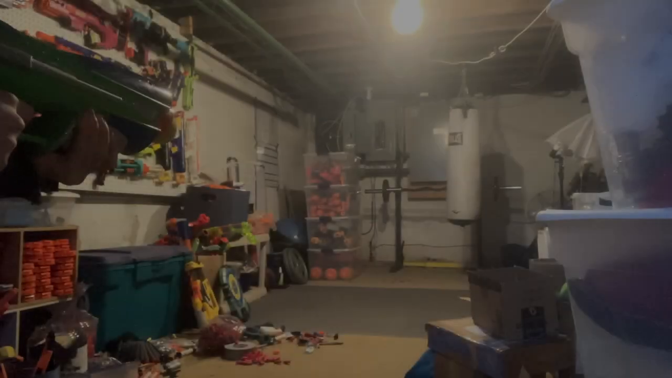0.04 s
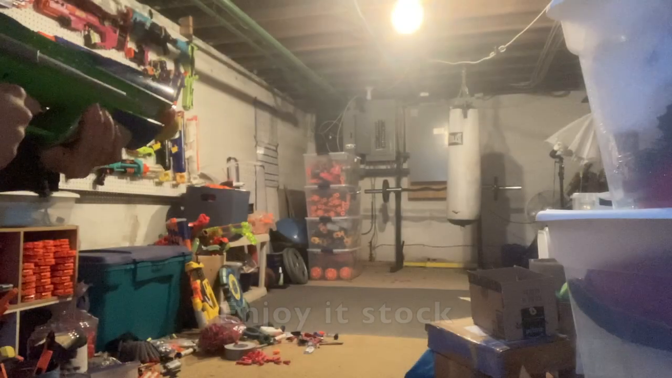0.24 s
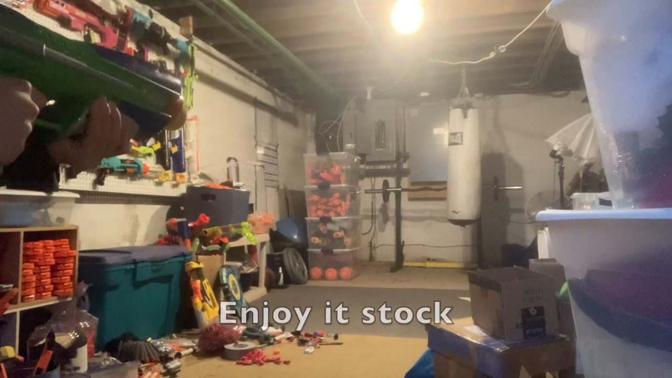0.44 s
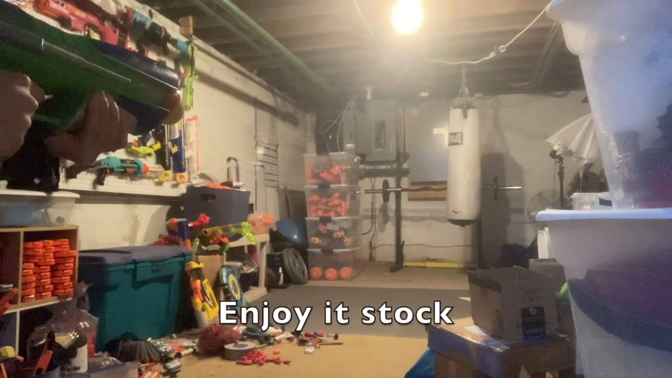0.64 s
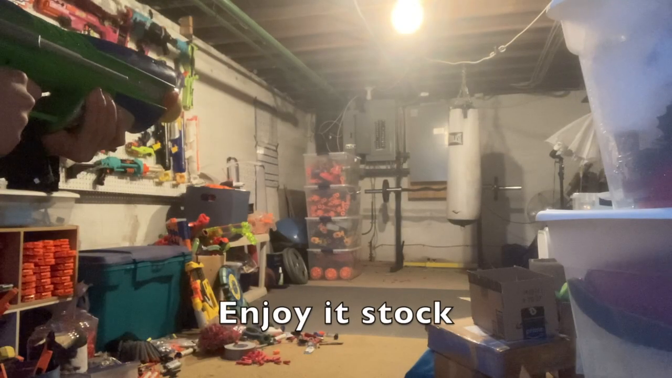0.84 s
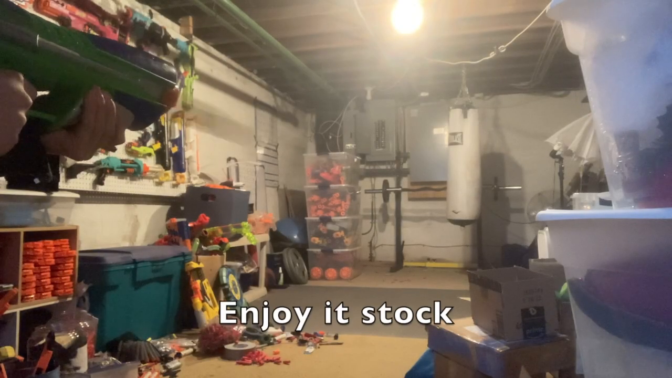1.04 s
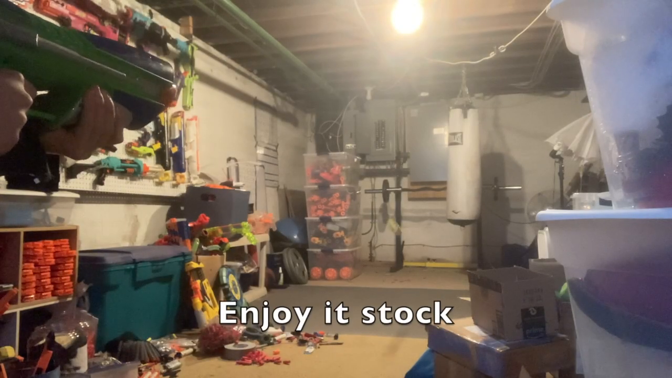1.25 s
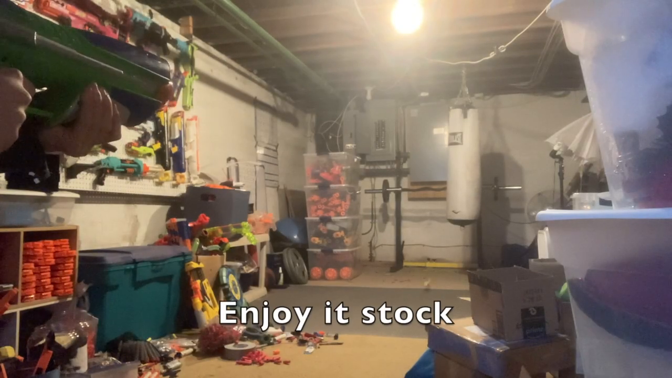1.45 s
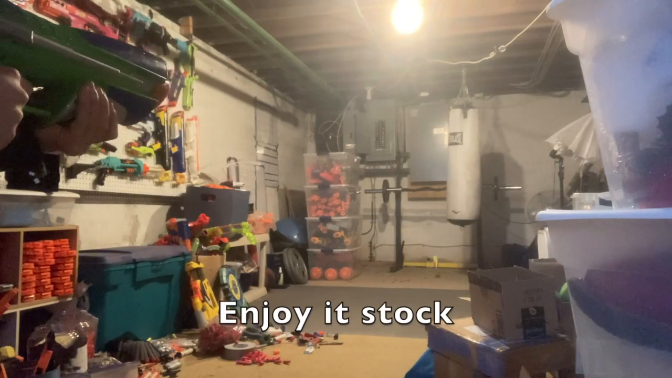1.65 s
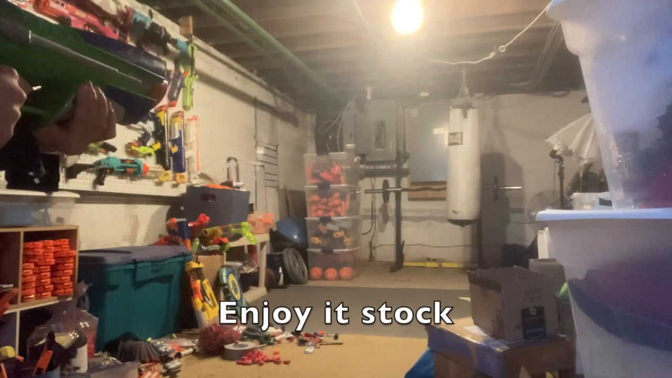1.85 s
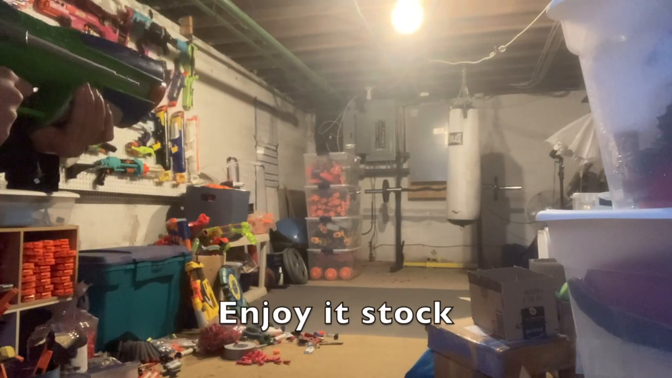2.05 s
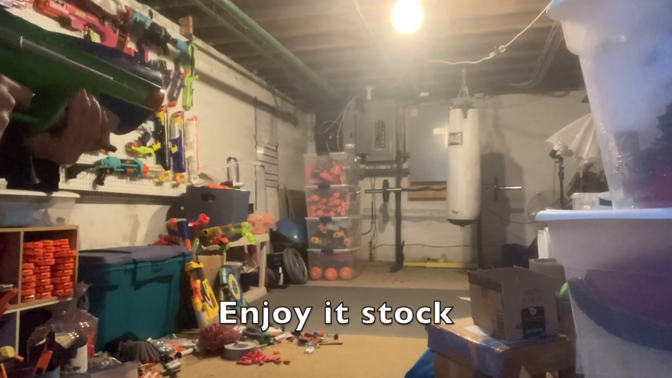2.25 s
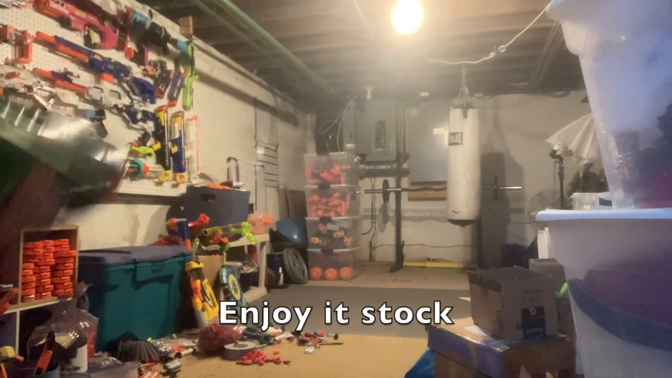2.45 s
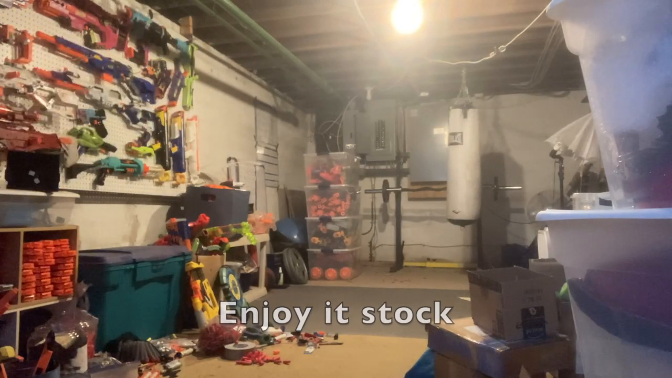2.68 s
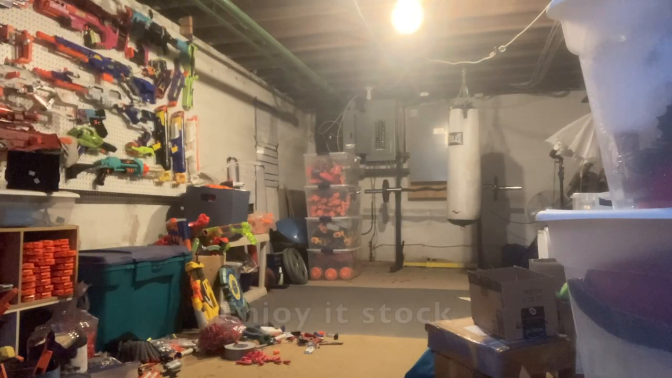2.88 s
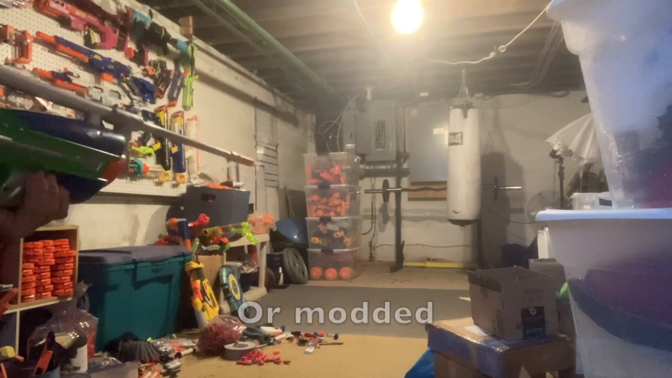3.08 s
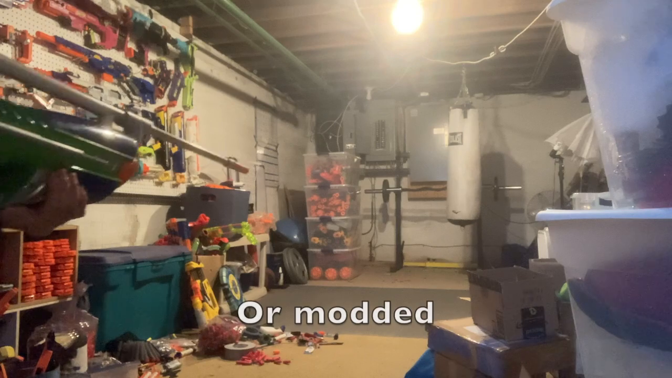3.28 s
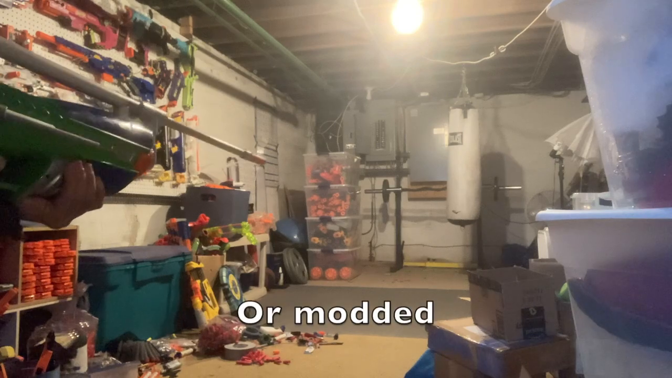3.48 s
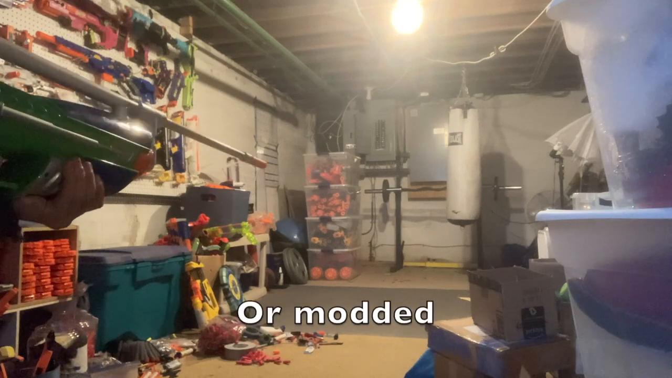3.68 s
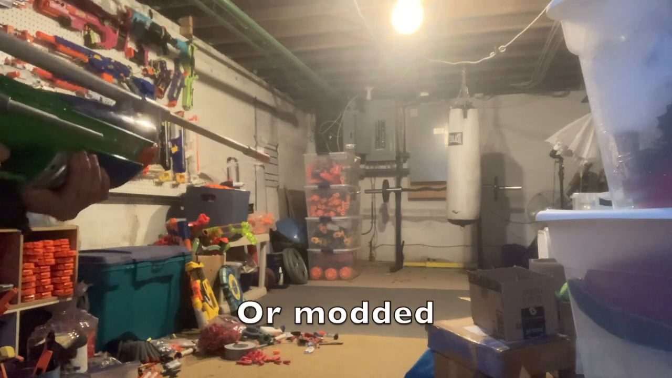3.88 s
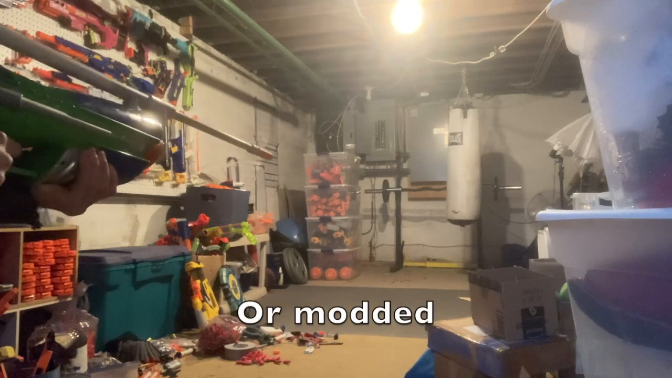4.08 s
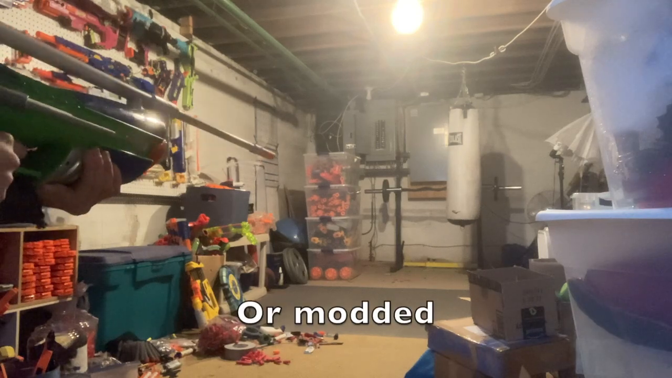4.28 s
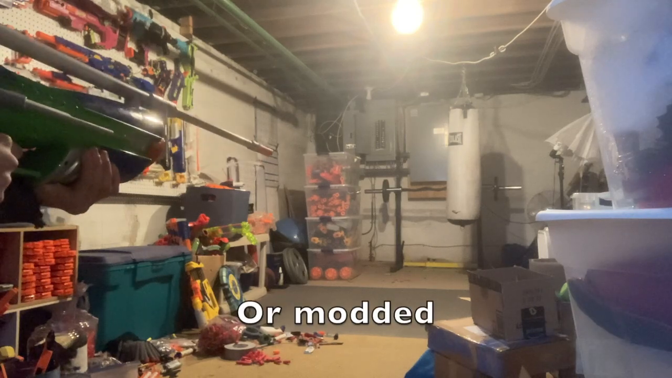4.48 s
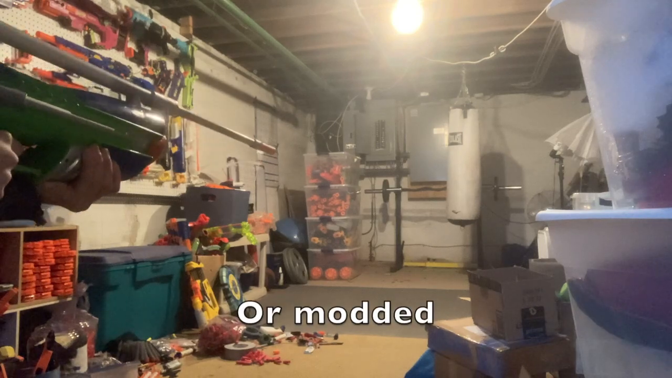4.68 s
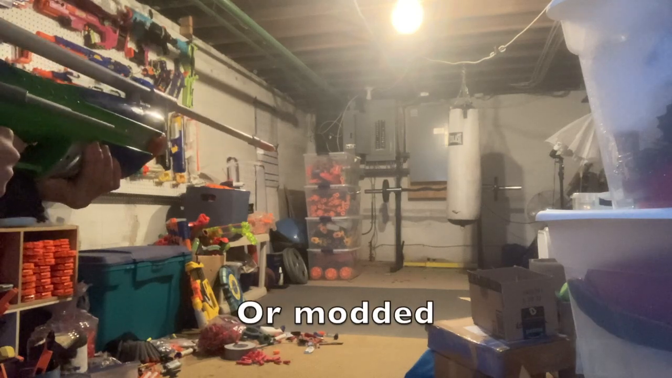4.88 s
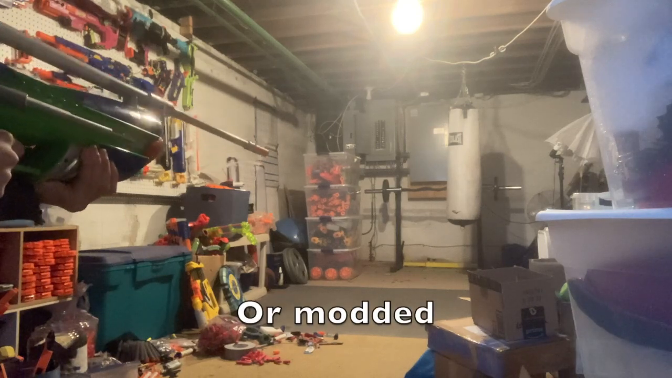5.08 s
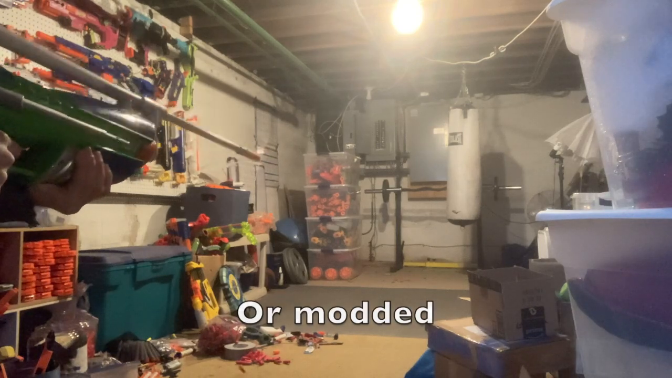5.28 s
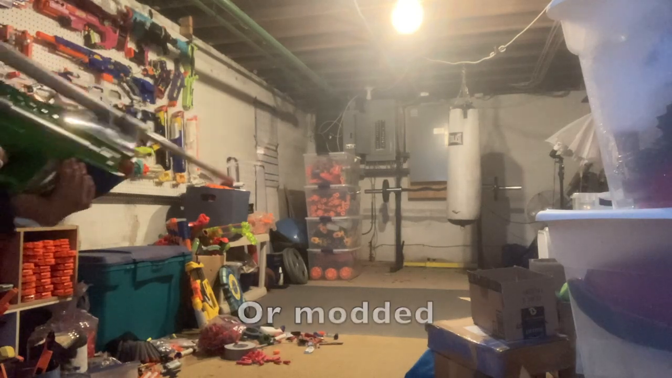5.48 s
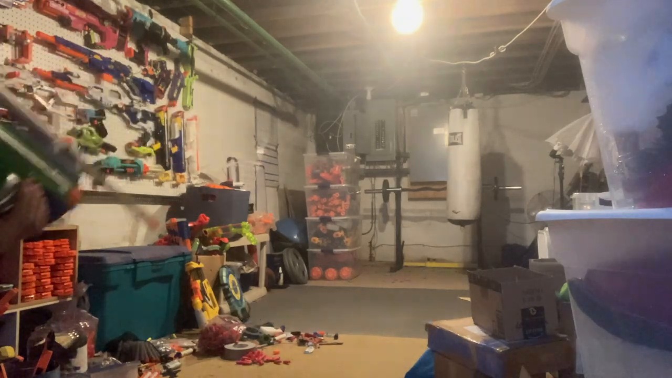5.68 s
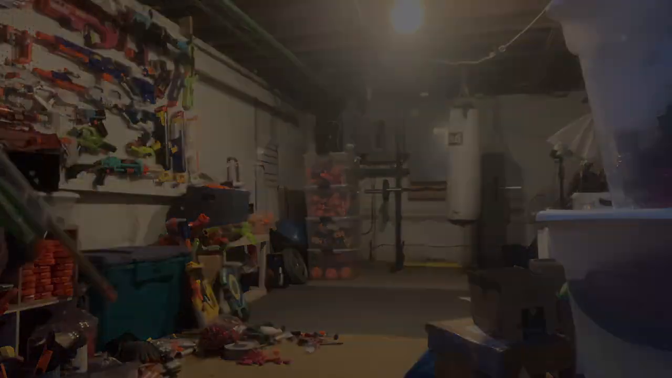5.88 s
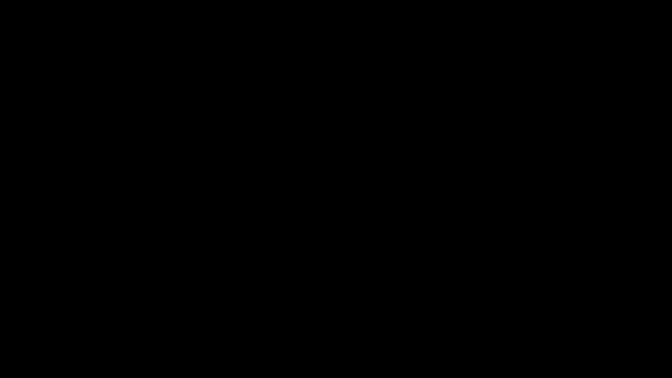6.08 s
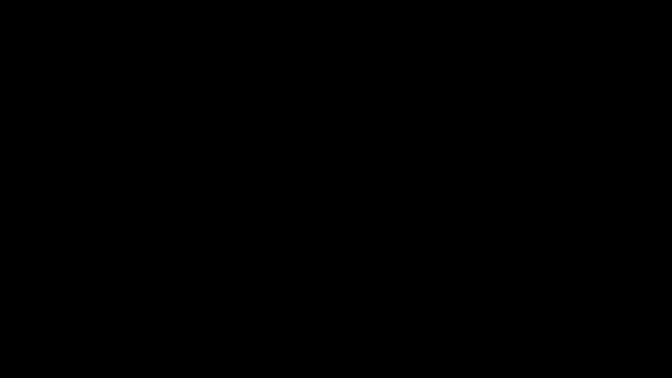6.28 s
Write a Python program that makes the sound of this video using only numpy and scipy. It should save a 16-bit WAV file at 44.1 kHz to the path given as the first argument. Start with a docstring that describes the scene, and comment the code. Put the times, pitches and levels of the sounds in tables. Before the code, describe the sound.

A quiet basement with a low, slightly uneven rumble, faint hiss and short reverberation, heard by stereo microphones close to a toy air blaster. From 0 to 0.2 s, small plastic clicks and a grainy hand rub. At 0.88 s a trigger click, then around 0.98 s a very loud shot: a tiny rising squeal, a crack, a hollow hooting pop and quickly fading air. Bright clicks follow at 1.1 to 1.4 s, with a dull thump at 1.4 s, then more clicks and knocks near 1.8 to 2.1 s. From 2.2 to 3.4 s sleeves rustle and plastic clatters, with firmer knocks at 2.4 and 2.6 s. Faint clicks come until a trigger click at 4.19 s. At 4.28 s a second shot cracks, sharper and brighter, with a short hiss; at 4.37 s its dart smacks the far wall. Soft rubs and knocks around 5 s dwindle, and the room tone sinks after 6.15 s.

```python
"""Two shots of a foam blaster in a basement

Air rushes as shaped noise: the first shot squeals, cracks and pops with hollow tones of the barrel;
the second, through a long barrel, is a sharp crack, and its dart smacks the far wall.
Before, between and after them plastic clicks and dull knocks sound in damped modes; hands and sleeves rub
as grainy noise. A low room tone lies beneath; a short cellar reverb and two microphone ports give the space."""
import sys
import numpy as np
from scipy import signal
from scipy.fft import rfft, irfft, next_fast_len
from scipy.io import wavfile
from scipy.ndimage import uniform_filter1d

SR = 44100
rng = np.random.default_rng(int(sys.argv[2]) if len(sys.argv) > 2 else 0)


def master_out(mix):
    """Clip the mix to full scale and print it as 16-bit PCM to the path in sys.argv[1]."""
    frames = np.transpose(np.atleast_2d(mix))
    ceiling = np.clip(frames, -1, 1)
    pcm = np.round(ceiling * 32767).astype(np.int16)
    wavfile.write(sys.argv[1], SR, pcm)


N = 279284  # length in samples


def gain_of(db):
    """Decibels to amplitude."""
    return 10 ** (np.asarray(db) / 20)


def evened(x):
    """Scales to rms 1."""
    return x / np.sqrt(np.mean(x ** 2) + 1e-20)


def read(points, hz):
    """Reads a table on a log-frequency axis."""
    f, value = np.transpose(points)
    return np.interp(np.log(hz + 1), np.log(f + 1), value)


def add(mix, s, sound):
    """Mixes a sound in at time s, or at the very start if s is negative."""
    part = mix[:, max(round(s * SR), 0):][:, :sound.shape[-1]]
    part += sound[..., :part.shape[-1]]


def envelope_db(t, rise, hold, t60):
    """Swells by 60 dB over the rise up to t = 0, holds, then dies by 60 dB per t60; all in seconds."""
    return 60 * np.minimum(t, 0) / rise - 60 * np.maximum(t - hold, 0) / t60


def noise(colour, size):
    """Two unrelated noises of one colour, rms 1: a shaped spectrum with random phases."""
    hz = np.fft.rfftfreq(size, 1 / SR)
    shape = evened(gain_of(read(colour, hz))) * np.sqrt(size)
    return irfft(shape * np.exp(2j * np.pi * rng.random((2, len(hz)))), size)


def burst(s, colour, db, rise, hold, t60):
    """A rush of noise that swells up to time s, holds and dies away."""
    t = np.arange(-SR // 20, SR // 2) / SR
    level_db = db + envelope_db(t, rise, hold, t60)
    out = np.zeros((2, N))
    add(out, s + t[0], gain_of(level_db) * noise(colour, len(t)))
    return out


def ring(hz, db, t60, rise):
    """One damped mode with a soft start."""
    t = np.arange(SR // 2) / SR
    return gain_of(db - 60 * t / t60) * (1 - np.exp(-t / rise)) * np.sin(2 * np.pi * hz * t)


def tone(hz, db, rise, hold, t60):
    """A resonance that is blown up to its level at 0.1 s, held and left to die."""
    t = np.arange(-SR // 10, SR // 2) / SR
    return gain_of(db + envelope_db(t, rise, hold, t60)) * np.sin(2 * np.pi * hz * t)


def shelves(hz, low_db, treble_db):
    """Gain in dB of a low and a treble shelf round a flat middle."""
    return read([(800, low_db), (1800, 0), (3800, 0), (7000, treble_db)], hz)


def grain(size):
    """Uneven level of many tiny contacts that come in clumps, rms 1."""
    fine, clumps = rng.standard_normal((2, size))
    fine_db = 3.3 * evened(uniform_filter1d(fine, 130))
    clumps_db = 1.5 * evened(uniform_filter1d(clumps, 900))
    return evened(gain_of(fine_db + clumps_db))


# decay of the cellar: (frequency [Hz], t60 [s])
CELLAR_DECAY = [(100, 0.32), (400, 0.56), (1000, 0.48), (3000, 0.31), (6000, .35), (10000, 0.24),
                (16000, 0.16)]


def cellar(x):
    """Dense reflections of random sign; the high treble dies first."""
    size = SR * 3 // 4
    taps = rng.choice([-1., 1.], (2, size)) * (rng.random((2, size)) < .15)
    taps *= np.clip((np.arange(size) / SR - .002) / 0.0066, 0, 1)  # builds up after 2 ms
    hz, t, z = signal.stft(taps, SR, nperseg=256)
    decay = gain_of(-60 * t / read(CELLAR_DECAY, hz)[:, None])
    tail = signal.istft(z * decay, SR, nperseg=256)[1]
    return signal.fftconvolve(x, tail / np.linalg.norm(tail[0]), axes=1)[:, :N]


# colour of the room's rumble and hiss: (frequency [Hz], level per Hz [dB])
ROOM_COLOUR = [(20, -2.5), (50, 2), (110, -3.5), (200, -12.5), (320, -12), (520, -20.5), (700, -17),
               (1100, -26.5), (2500, -28), (6000, -37), (9000, -35), (15500, -37.5)]


def room_tone():
    """A low, slightly uneven rumble with faint hiss; it sinks by 8 dB at the end."""
    t = np.arange(N) / SR
    knots = np.arange(0, 7, 1 / 10)
    swell_db = 0.42 * np.interp(t, knots, rng.standard_normal(len(knots)))
    fade_db = np.interp(t, [6.15, 6.33], [0, -8])
    return gain_of(-62.0 + swell_db + fade_db) * noise(ROOM_COLOUR, N)


# colour of skin and cloth on plastic: (frequency [Hz], level per Hz [dB])
RUB_COLOUR = [(100, 1), (350, 5), (650, 7.5), (1100, 1), (2200, 6.5), (4200, -2), (6200, -3.5), (9000, -5),
              (15500, -13)]


def friction(level_db, treble_db):
    """Grainy noise of skin and cloth on plastic, following a level and a treble level."""
    full = noise(RUB_COLOUR, N)
    dull_gain = gain_of(shelves(np.fft.rfftfreq(N, 1 / SR), 0, -30))
    dull = irfft(rfft(full) * dull_gain, N)
    return (dull + gain_of(treble_db) * (full - dull)) * grain(N) * gain_of(level_db)


# short slides of the hand as the grip shifts: (start [s], length [s], level [dB])
GRIP_SLIDES = [(0.0, 0.064, -48), (0.867, 0.073, -49.5), (1.731, 0.11, -47.5), (3.361, 0.036, -60.5),
               (4.171, .07, -46.5), (4.941, 0.063, -54), (5.025, 0.054, -53), (5.079, 0.0067, -52.5),
               (5.601, 0.61, -73.5)]
GRIP_SWELL_S, GRIP_FADE_S, GRIP_TREBLE_DB = 0.027, 0.3, -6  # swell and fade over 60 dB
# sleeves rub as one blaster is lowered and the other raised: (time [s], level [dB], treble [dB])
SLEEVE_SWING = [(2.2, -76.5, -20), (2.235, -50.5, -32), (2.3, -61.5, -12), (2.32, -50, -9.5),
                (2.5, -60.5, -6), (2.701, -48, -5), (2.8, -55, -5), (2.97, -61.5, -1.5), (2.99, -49, -0.5),
                (3.14, -52.5, -0.5), (3.22, -63, -12), (3.45, -78, -7.5)]


def rubbing():
    """Each shift of the grip swells, holds and fades; the change of blasters is one long rub."""
    t = np.arange(N) / SR
    slides_db = [db + envelope_db(t - s, GRIP_SWELL_S, length, GRIP_FADE_S) for s, length, db in GRIP_SLIDES]
    grip = friction(np.max(slides_db, axis=0), GRIP_TREBLE_DB)
    times, level_db, treble_db = np.transpose(SLEEVE_SWING)
    swing_db = np.interp(t, times, level_db, -np.inf, -np.inf)  # silent outside the table
    out = grip + friction(swing_db, np.interp(t, times, treble_db))
    return out + gain_of(-10.5) * cellar(out)


# colour of the crunch at a contact: (frequency [Hz], level per Hz [dB])
CRUNCH_COLOUR = [(100, -20.5), (350, -15), (700, -2), (1400, -1.5), (2200, 0), (3500, -3.5), (4600, -4),
                 (6200, -3.5), (9000, -10.5), (15500, -13)]
# resonances of the plastic shell: (frequency [Hz], level [dB])
SHELL_RESONANCES = [(790, -8.5), (1050, -10), (1420, -2.5), (2080, -7), (2480, -1.5), (2850, -3),
                    (3120, 0.5), (3450, -2.5), (3800, -7), (4150, -2.5), (4500, -4.5), (4950, -4.5),
                    (5800, -9)]
SHELL_T60 = .035  # s
CLICK_RISE_S, CLICK_HOLD_S, CLICK_T60 = .013, 0.0015, .032  # swell and ring over 60 dB
CLICK_BODY_DB, BODY_PER_TREBLE = -4.5, 0.018  # low body in dB, and its change per dB of treble


def click(s, db, treble_db, spot_hz):
    """A brief crunch that rings the shell; the spot that is hit favours the modes round one pitch."""
    t = np.arange(-SR // 50, SR // 6) / SR
    after, hz = np.maximum(t - CLICK_HOLD_S, 0), np.fft.rfftfreq(len(t), 1 / SR)
    mode_hz, mode_db = np.transpose(SHELL_RESONANCES)[:, :, None]
    weight, detune = rng.standard_normal((2, len(SHELL_RESONANCES), 1))
    phase = 2 * np.pi * rng.random((2, len(SHELL_RESONANCES), 1))
    mode_gain = evened(1 + .5 * weight) * gain_of(mode_db - 60 * after / SHELL_T60)
    modes = mode_gain * np.sin(2 * np.pi * mode_hz * (1 + 0.024 * detune) * t + phase)
    crunch = noise(CRUNCH_COLOUR, len(t)) * gain_of(-60 * after / CLICK_T60)
    swell = gain_of(db + 60 * np.minimum(t, 0) / CLICK_RISE_S)
    snap = (gain_of(-7) * crunch + gain_of(-16.0) * modes.sum(1)) * swell
    colour_db = shelves(hz, CLICK_BODY_DB + BODY_PER_TREBLE * treble_db, treble_db + 13)
    spot_db = 6 * np.exp(-(np.log2((hz + 1) / spot_hz) / .35) ** 2)
    return s + t[0], irfft(rfft(snap) * gain_of(colour_db + spot_db), len(t))


# sharp clicks of trigger, valve and shell; click() lifts the treble by 13 dB:
# (time [s], level [dB], treble before the lift [dB], favoured pitch [Hz])
SHARP_CLICKS = [(0.0104, -30.5, -13, 3739), (0.0483, -32, -26, 2180), (0.129, -33, -36, 3470),
                (0.1423, -30.5, -25, 3730), (0.1967, -39.5, -40, 2970), (0.8752, -24.5, -17.5, 3300),
                (0.937, -27, -17.5, 850), (1.143, -30, -9.5, 4848), (1.2655, -24, -9.5, 5000),
                (1.397, -24.5, -11.5, 4785), (1.742, -25, -8.5, 4600), (1.7842, -32.5, -10, 4000),
                (1.8075, -34, -9, 4500), (1.8964, -30, -30, 3590), (1.932, -35.5, -37.5, 3080),
                (1.956, -25.5, -30.5, 3354), (2.1211, -33.5, -27.5, 3294), (2.4019, -23, -14, 4350),
                (2.4181, -27, -23, 2967), (2.517, -37, -8, 2690), (2.582, -24, -36, 2620),
                (2.5952, -34, -38, 2900), (2.627, -35.5, -30, 2100), (2.6906, -30.5, -18, 2000),
                (2.75, -38, -27, 1900), (3.154, -39, -41, 2520), (3.3573, -41.5, -25, 3094),
                (3.3784, -37.5, -19.5, 4020), (3.5374, -35, -20.5, 3500), (3.628, -48.5, -35, 3400),
                (4.165, -45, -31, 1200), (4.1922, -22.5, -16.5, 1500), (4.9396, -49.5, -2.5, 3911),
                (5.0965, -36, -27, 2530), (5.281, -52.5, -32, 2670), (5.409, -58, -25, 2900),
                (6.0776, -41, -49.5, 2538)]
# spans of faint ticks of loose parts while the blaster is moved: (start [s], end [s])
JOSTLE_SPANS = [(0.019, .09), (2.8, 2.92), (4.95, 5.08)]
TICKS_PER_S, TICK_DB, TICK_TREBLE_DB, TICK_HZ = 9, -48.5, -20, 2080


def clicks():
    """The clear clicks, and faint ticks at random while the blaster is moved."""
    out = np.zeros((2, N))
    for row in SHARP_CLICKS:
        add(out, *click(*row))
    for start, end in JOSTLE_SPANS:
        count = int(np.ceil((end - start) * TICKS_PER_S))
        for place, spot in rng.random((count, 2)):
            tick_s = start + place * (end - start)
            tick_hz = TICK_HZ * 2 ** (spot - .5)  # half an octave either way
            add(out, *click(tick_s, TICK_DB, TICK_TREBLE_DB, tick_hz))
    return out + gain_of(-13.0) * cellar(out)


# dull thumps and knocks, of the blaster or of things hit: (time [s], level [dB], pitch [Hz], t60 [s])
DULL_KNOCKS = [(1.408, -23, 230.8, 0.14), (1.825, -27.5, 291, 0.07), (1.957, -32.5, 1000, 0.072),
               (2.404, -32, 516, 0.057), (2.420, -30.5, 544, 0.15), (2.552, -37, 640, 0.074),
               (2.581, -23.5, 615, .11), (3.541, -37.5, 346.9, 0.075), (4.200, -28.5, 724, 0.053),
               (4.248, -27, 736, 0.028), (5.092, -36.5, 337, 0.074), (5.676, -49, 557, 0.15),
               (5.860, -54, 913, 0.19)]
# colour of the loose shake after a knock: (frequency [Hz], level per Hz [dB])
LOOSE_COLOUR = [(100, -6), (300, -1.5), (700, -1), (2100, -4), (3500, -13.5), (7000, -18.5), (15500, -30)]
KNOCK_RISE_PER_T60 = .02  # the longer a knock lasts, the slower it starts
# a knock shakes loose parts, less so the higher and lighter it is
SHAKE_DB, SHAKE_HZ, SHAKE_DB_PER_OCTAVE, SHAKE_T60 = -9.5, 225, -15.5, 0.22


def knocks():
    """Dull thumps and knocks: two low resonances, a brief rattle and a shake of loose parts."""
    t, out = np.arange(SR // 2) / SR, np.zeros((2, N))
    for s, db, hz, t60 in DULL_KNOCKS:
        rise = KNOCK_RISE_PER_T60 * t60
        thump = ring(hz, db - 4.0, t60, rise) + ring(hz * .82, db - 8.5, t60, rise)
        rattle_colour = [(hz / 8, -34), (hz / 2, -13), (hz, 0), (hz * 2, -10), (2200, -13), (3500, -23),
                         (7000, -34)]
        rattle = noise(rattle_colour, len(t)) * gain_of(db - 5.5 - 60 * t / t60)
        shake_db = db + SHAKE_DB + SHAKE_DB_PER_OCTAVE * np.log2(hz / SHAKE_HZ)
        shake = noise(LOOSE_COLOUR, len(t)) * grain(len(t)) * gain_of(shake_db - 60 * t / SHAKE_T60)
        add(out, s, thump + (rattle + shake) * (1 - np.exp(-t / rise)))
    return out + gain_of(-16.5) * cellar(out)


# colour of the dart's smack: (frequency [Hz], level per Hz [dB])
DART_COLOUR = [(100, -28), (400, -24.5), (1000, -5.5), (2200, 6.5), (3700, 5.5), (5600, -9.5), (8700, -4.5),
               (12000, -6.5), (15500, -8.5)]


def dart():
    """The dart smacks the far wall: a thin tick and mostly room."""
    smack = burst(4.372, DART_COLOUR, db=-12.0, rise=0.00067, hold=0.00098, t60=0.016)
    return smack + gain_of(-1.0) * cellar(smack)


# colours of the long barrel's crack and of its air: (frequency [Hz], level per Hz [dB])
LONG_CRACK_COLOUR = [(25, -30.5), (100, -13.5), (400, 0), (900, 2), (1500, -2), (3200, 2.5), (4700, -6.5),
                     (6300, -5), (8200, 0), (11500, -3.5), (15500, -14.5)]
LONG_AIR_COLOUR = [(20, -35.5), (45, -16.5), (100, 3), (400, -1.5), (1000, -1), (2400, 6), (4500, -3),
                   (6300, -2.5), (8800, -1.5), (11500, -6.5), (15500, -11.5)]


def long_shot():
    """The long barrel gives a brighter crack, a low push in three damped modes and a short hiss of air."""
    leak = burst(4.264, LONG_AIR_COLOUR, db=-25, rise=0.01793, hold=0.012, t60=0.013)
    crack = burst(4.2762, LONG_CRACK_COLOUR, db=-8.0, rise=0.021, hold=0.0043, t60=.006)
    air = burst(4.282, LONG_AIR_COLOUR, db=-16.5, rise=.004, hold=.012, t60=0.22)
    shot = leak + crack + air
    add(shot, 4.2725, ring(720, -10, 0.0098, rise=.0003))
    add(shot, 4.2812, ring(300, -8, .018, rise=0.00017))
    add(shot, 4.279, ring(82, -29.5, 0.25, rise=.002))
    return shot + gain_of(-12) * cellar(shot)


# colours of the short barrel's squeal, crack and air: (frequency [Hz], level per Hz [dB])
SQUEAL_COLOUR = [(100, -28), (600, -21.5), (1100, -9), (1430, 1), (1850, -16.5), (4000, -18.5), (7500, -27),
                 (10000, -48), (15500, -55)]
SHORT_CRACK_COLOUR = [(80, -21.5), (300, -7), (800, -8), (1350, 0), (2100, -8.5), (3200, -1.5),
                      (4700, -13.5), (8000, -25.5), (15500, -20.5)]
SHORT_AIR_COLOUR = [(20, -32), (45, -13.5), (90, 1.5), (220, 3), (400, 6), (700, -0.5), (1000, -5),
                    (2000, 4.5), (3200, -2.5), (4700, 0.5), (8000, -1.5), (12000, -3.5), (15500, -3.5)]
# tones of the short barrel and tank, blown by the escaping air; the last row is the 425 Hz pop's tone lingering
# on in the cellar: (time [s], frequency [Hz], level [dB], swell [s], hold [s], t60 [s])
BARREL_TONES = [(0.97, 1430, -11.5, .042, .003, .03), (.997, 315, -20, .012, 0.0022, .05),
                (.982, 1200, -12, 0.012, .002, .03), (0.995, 86, -30, .01, .002, 0.15),
                (0.98, 227, -23, 0.0073, 0.0019, 0.16), (1, 425, -10, .01, .003, .045),
                (.999, 639, -6, 0.0046, 0.0064, .04), (1.0372, 661.5, -17, .09, .02, .06),
                (1.0487, 415, -32.5, .04, .02, 0.217)]
VALVE_OPEN_S = .98  # the valve lets go


def short_shot():
    """Air squeals past the opening valve, cracks, drives the dart out, then empties through the hooting barrel."""
    squeal = burst(.971, SQUEAL_COLOUR, db=-26, rise=.022, hold=.009, t60=.01)
    crack = burst(VALVE_OPEN_S, SHORT_CRACK_COLOUR, db=-6.5, rise=0.00068, hold=0.0045, t60=0.025)
    push = burst(VALVE_OPEN_S, SHORT_AIR_COLOUR, db=-18.5, rise=.006, hold=0.0017, t60=0.022)
    air = burst(0.99, SHORT_AIR_COLOUR, db=-12.5, rise=0.028, hold=0.01, t60=0.22)
    pop = np.zeros((2, N))
    for s, hz, db, rise, hold, t60 in BARREL_TONES:
        add(pop, s - 1 / 10, tone(hz, db, rise, hold, t60))  # tone() peaks 0.1 s in
    shot = squeal + crack + push + air
    return shot + pop + gain_of(-19) * cellar(shot) + gain_of(-26) * cellar(pop)


# bounces off floor, shelf and joists near the microphones: (delay [s], level [dB])
NEAR_BOUNCES = [(.0011, -22), (.0027, -15.5), (.0052, -18.5), (.0083, -16.5)]
# how alike the two ports hear: (frequency [Hz], likeness [0-1])
PORT_LIKENESS = [(90, 0.92), (300, 0.78), (550, .75), (900, 0.42), (1800, 0.49), (2700, 0.35), (4000, .35),
                 (6000, 0.55), (8000, .94), (16000, .94)]
# phase by which the left port leads: (frequency [Hz], lead [rad])
LEFT_LEAD = [(0, 0), (300, -.1), (780, .1), (1430, .4), (1750, 3.1), (2600, 3.6), (3400, 4.3), (4400, 4.8),
             (5300, 8.2), (6150, 9.42), (16400, -6.9)]
# the body that holds the ports shades one of them: (frequency [Hz], left minus right [dB])
PORT_SHADE = [(90, 0.5), (250, 0.75), (600, -0.5), (1000, 2), (4000, 0.6), (9000, -0.05)]


def scene():
    """All sources at two ports, most alike in bass and top treble; all but the room tone bounce nearby."""
    size = next_fast_len(N + SR // 10)
    hz = np.fft.rfftfreq(size, 1 / SR)
    bounces = 1 + sum(gain_of(db) * np.exp(-2j * np.pi * hz * delay) for delay, db in NEAR_BOUNCES)
    sources = rubbing() + clicks() + knocks() + dart() + long_shot() + short_shot()
    left, other = rfft(sources, size) * bounces + rfft(room_tone(), size)
    same = np.clip(read(PORT_LIKENESS, hz), 0, 1)
    # a quarter turn keeps pure tones equally loud in both ports
    right = same * left - 1j * np.sqrt(1 - same ** 2) * other
    lead = np.exp(1j * np.interp(hz, *np.transpose(LEFT_LEAD)))
    shade = gain_of(read(PORT_SHADE, hz) / 2)
    return irfft(np.array([left * lead * shade, right / shade]), size)[:, :N]


EDGE_HZ = 16200  # upper band limit


def record(dry):
    """The microphones shed the deepest bass, overloads clip; then the band limit."""
    thinned = signal.sosfilt(signal.butter(3, 50, "high", fs=SR, output="sos"), dry)
    clipped = np.clip(thinned, -.95, .95)
    band_limit = signal.firwin(255, EDGE_HZ, window=("kaiser", 8), fs=SR)
    return signal.oaconvolve(clipped, band_limit[None], "same")


dry = scene()
out = record(dry)
master_out(out)
```